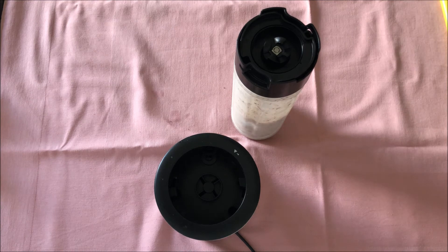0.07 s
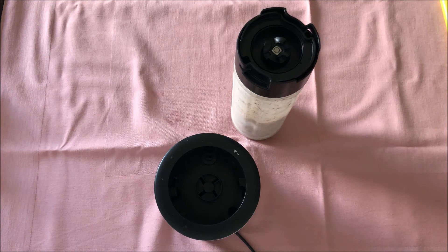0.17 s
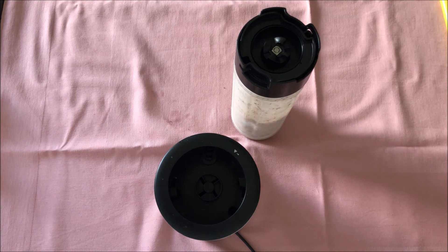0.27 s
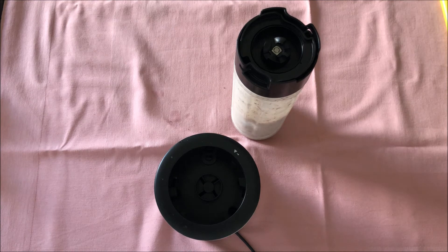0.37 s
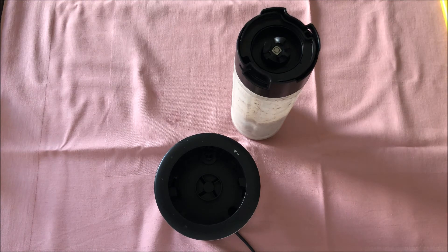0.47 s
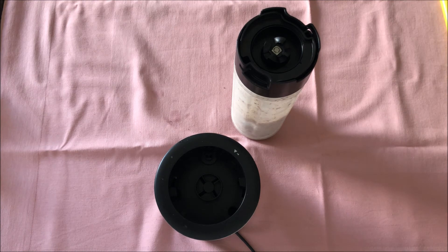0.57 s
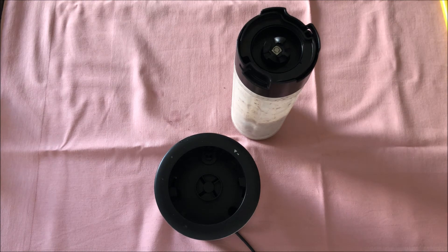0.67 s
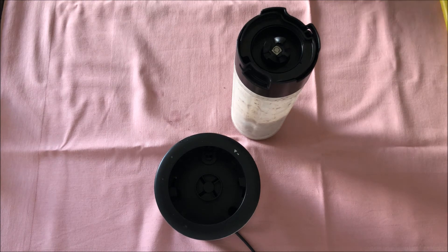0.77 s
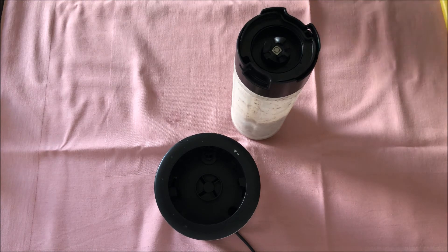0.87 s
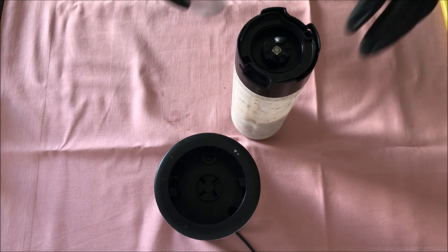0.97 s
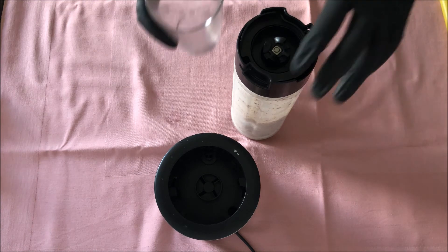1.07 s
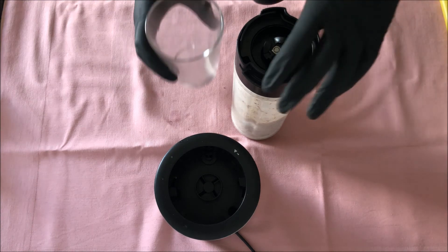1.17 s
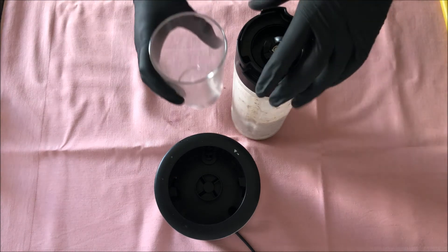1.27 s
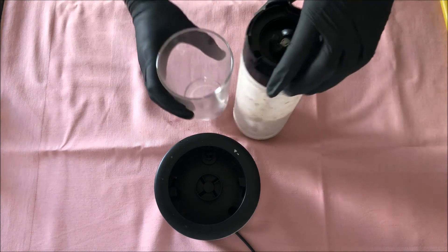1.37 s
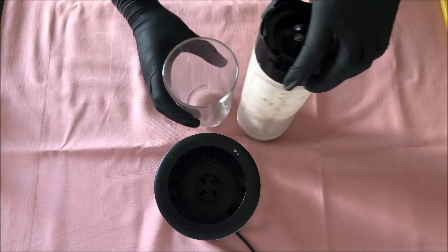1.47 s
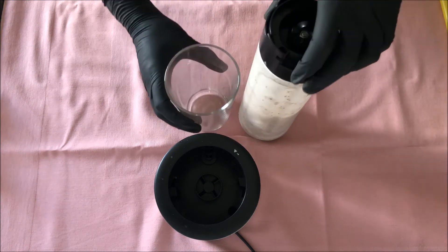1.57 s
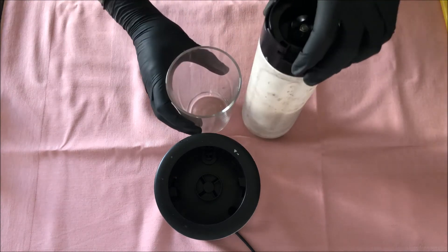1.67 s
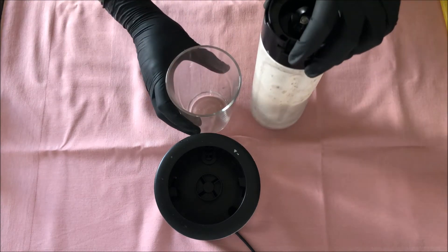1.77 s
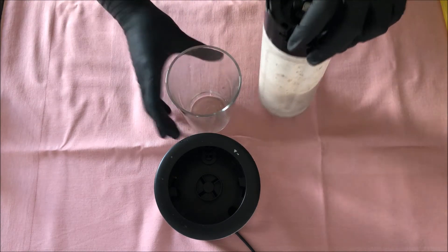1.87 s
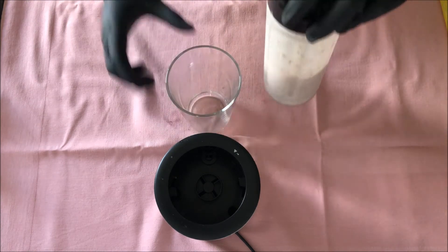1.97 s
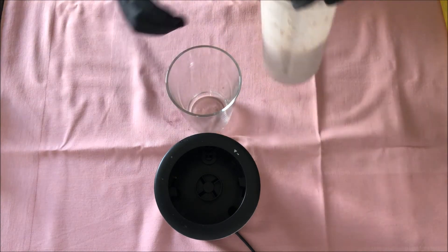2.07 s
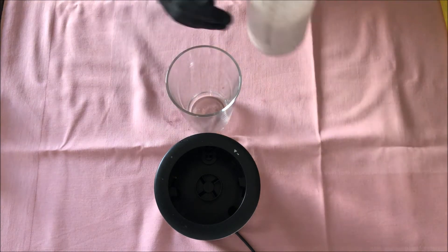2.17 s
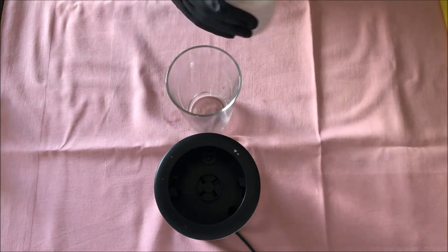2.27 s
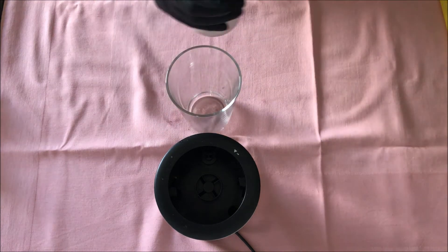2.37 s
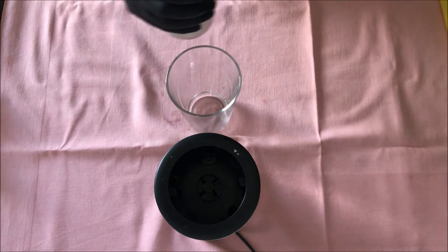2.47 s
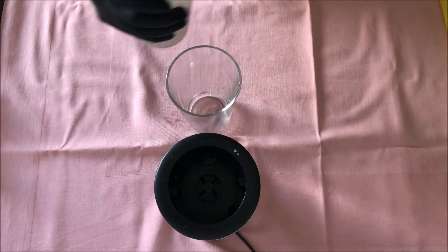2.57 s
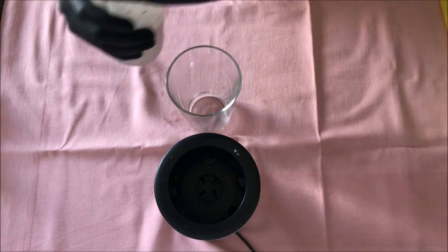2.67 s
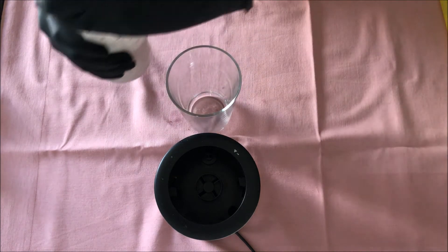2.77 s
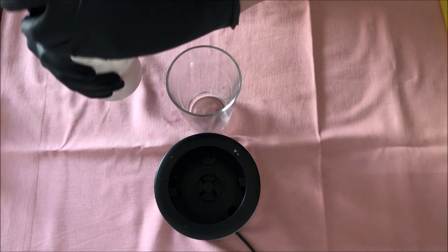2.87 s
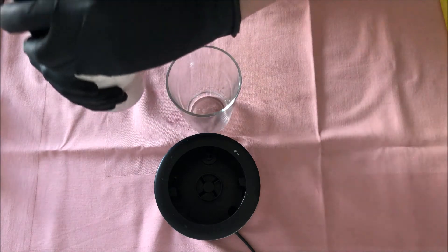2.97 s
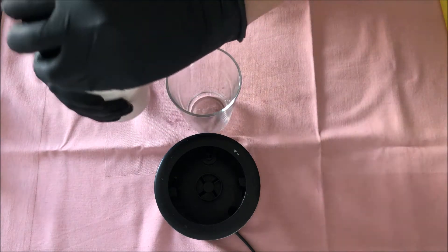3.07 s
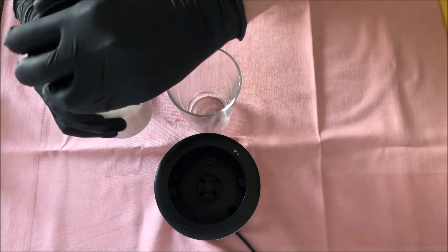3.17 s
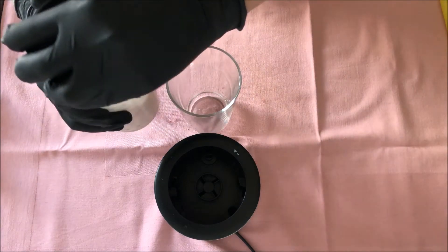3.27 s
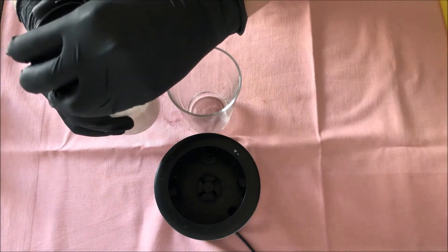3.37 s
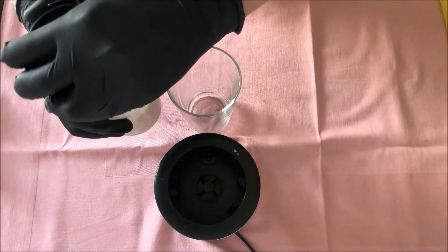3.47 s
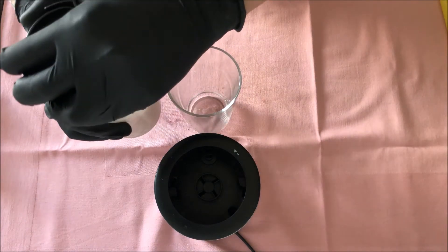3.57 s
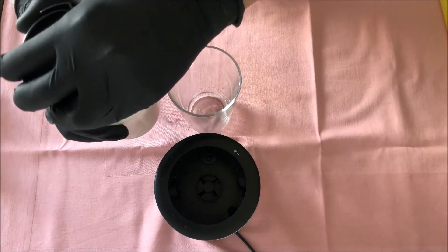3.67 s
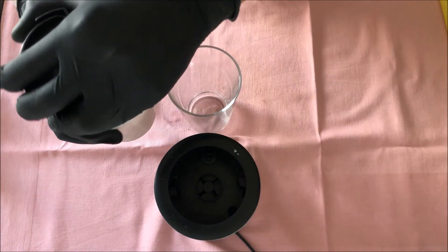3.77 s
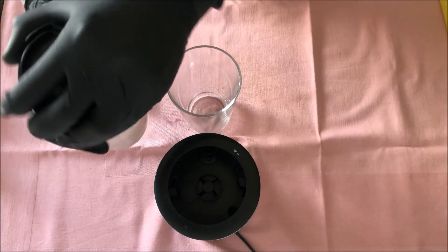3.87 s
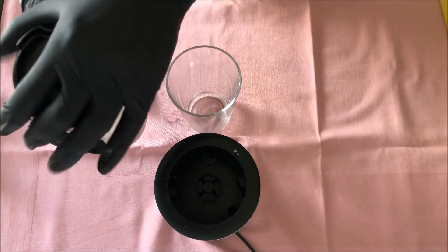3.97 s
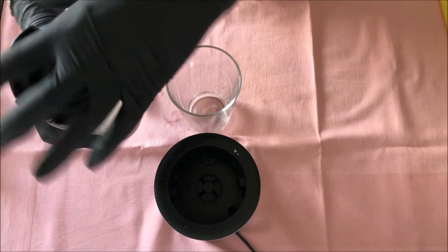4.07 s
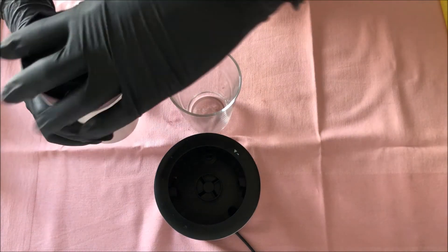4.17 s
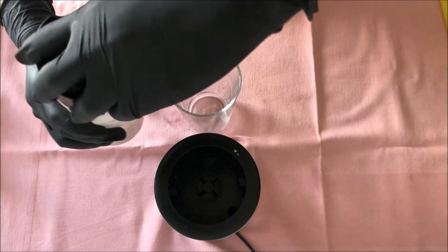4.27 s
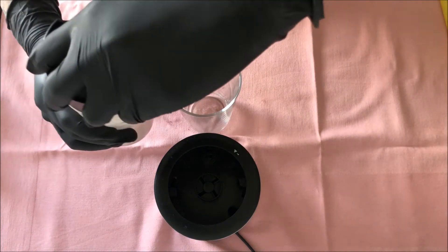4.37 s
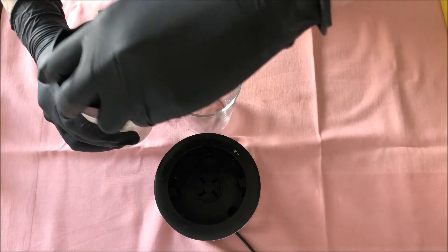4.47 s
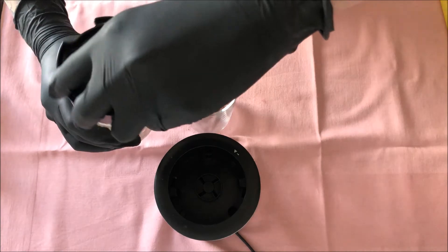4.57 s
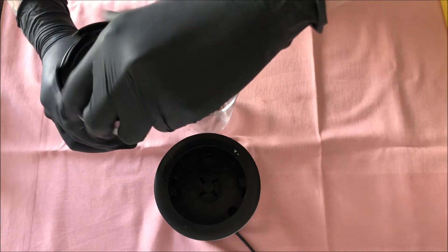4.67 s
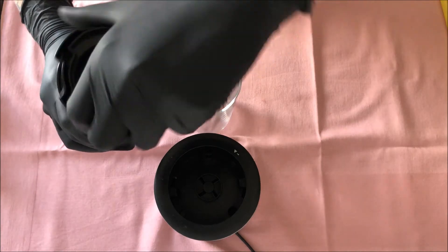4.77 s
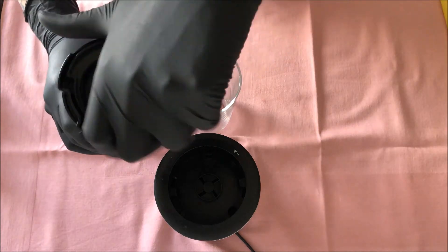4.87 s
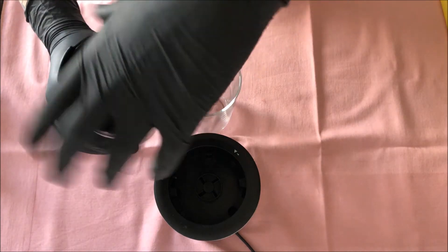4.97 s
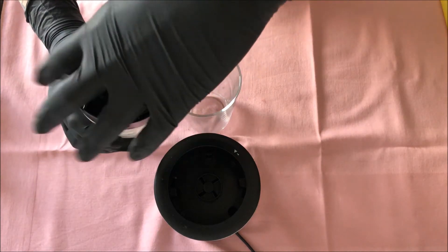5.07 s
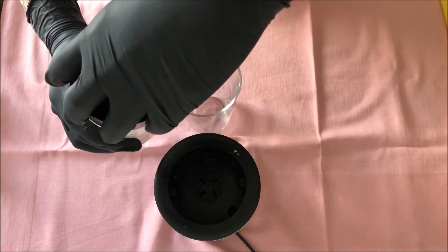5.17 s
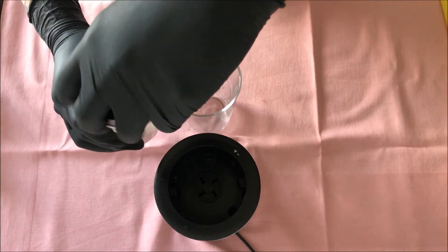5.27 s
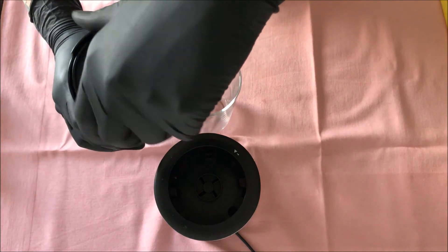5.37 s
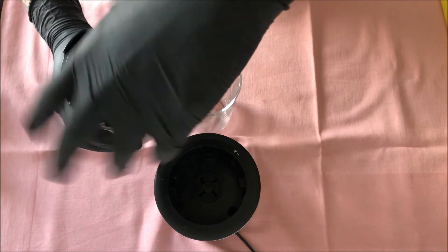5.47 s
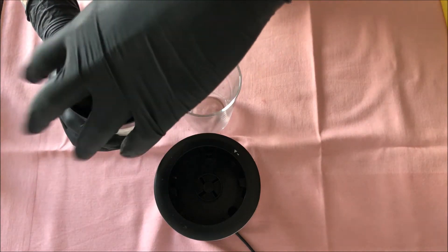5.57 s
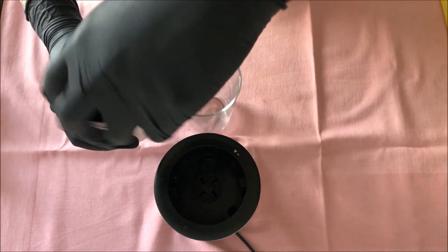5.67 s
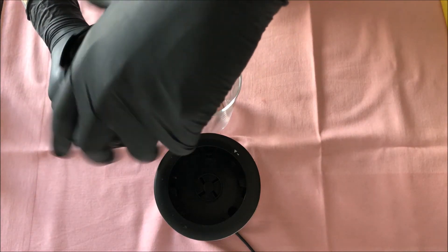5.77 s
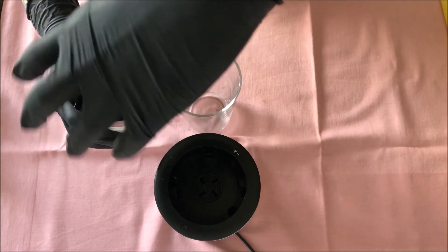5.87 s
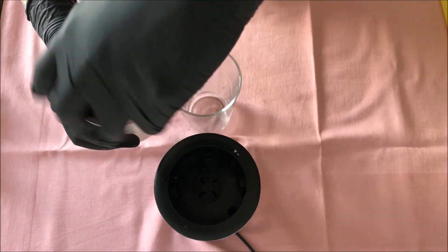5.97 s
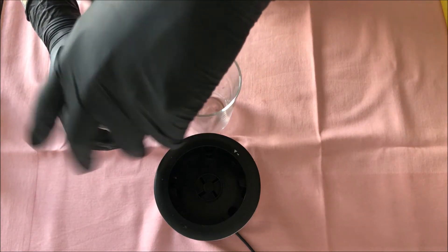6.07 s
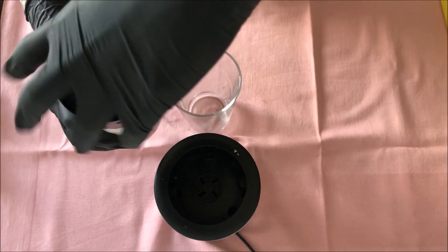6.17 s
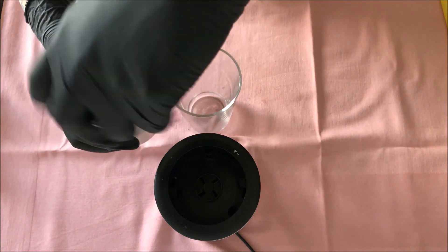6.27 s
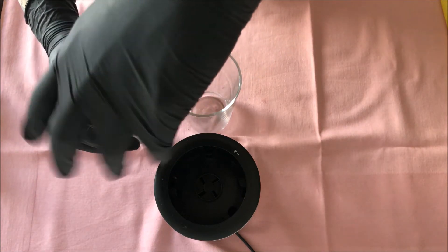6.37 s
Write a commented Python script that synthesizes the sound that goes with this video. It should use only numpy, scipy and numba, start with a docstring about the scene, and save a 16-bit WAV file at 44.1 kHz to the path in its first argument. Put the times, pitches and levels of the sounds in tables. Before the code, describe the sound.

A glass thumps onto a cloth-covered table, then gloved hands unscrew a plastic cup's lid with scrapes and sharp clicks.

```python
"""A small quiet room hums with a low drone and a thin whine while gloved hands rustle and tick.
At about 1.6 s they set a tumbler down on a cloth-covered table, and the table top booms under it.
They lift a plastic cup and, from about 3.2 s to the end, unscrew its lid turn by turn:
the thread sticks and slips, so the lid scrapes and snaps. The room adds a short echo."""
import sys
import numpy as np
from scipy import signal
from scipy.io import wavfile
from scipy.ndimage import uniform_filter1d
from numba import njit

SR = 44100
rng = np.random.default_rng(int(sys.argv[2]) if len(sys.argv) > 2 else 0)


def unload_wav(signal):
    """Save mono or channel-first audio to the path in sys.argv[1] as 16-bit WAV at rate SR, clipped to [-1, 1]."""
    wavfile.write(
        sys.argv[1],
        SR,
        np.round(np.clip(np.atleast_2d(signal).T, -1, 1) * 32767).astype(np.int16),
    )


N = 283563
TIME = np.arange(N) / SR

# low notes at which the lid and cup wall ring: f/Hz, width/Hz, relative level/dB
LID_LOW_MODES = [(484, 206, -0.5), (992, 134, -1), (1113, 110, 1), (1362, 104, 6), (1450, 290, 3.5),
                 (1767, 340, 2), (1930, 35, 7), (2150, 230, -3.5), (2377, 99, 0.5), (2664, 620, -3)]


def undb(db):
    """Turn decibels into a gain."""
    return 10 ** (np.asarray(db) / 20)


def unit(x):
    """Scale to an average (rms) level of 1."""
    return x / np.sqrt(np.mean(x ** 2))


def band(x, hz, width):
    """A resonance: keeps the sound near hz and weakens the rest."""
    return signal.lfilter(*signal.iirpeak(min(hz, .45 * SR), hz / width, fs=SR), x)


@njit
def glide(x, hz, width):
    """A resonance whose pitch moves (a state-variable filter)."""
    out, band_state, low_state = np.empty(len(x)), 0., 0.
    for i in range(len(x)):
        step, damping = np.tan(np.pi * hz[i] / SR), width / hz[i]
        passed = (band_state + step * (x[i] - low_state)) / (1 + step * (step + damping))
        band_state = 2 * passed - band_state
        low_state += 2 * step * passed
        out[i] = damping * passed
    return out


def body(x, modes):
    """An object ringing at several notes; neighbouring notes swing opposite ways."""
    return sum((-1) ** k * undb(db) * band(x, hz, width) for k, (hz, width, db) in enumerate(modes))


def add(track, start, sound):
    """Mix a short sound in at start seconds."""
    i = int(start * SR)
    track[i:i + len(sound)] += sound[:N - i]


def wander(per_s):
    """A smooth random wobble of size 1, with per_s new values a second."""
    hold = int(SR / per_s)
    steps = np.repeat(rng.standard_normal(N // hold + 1), hold)
    return unit(uniform_filter1d(uniform_filter1d(steps, hold), hold)[:N])


def grains(per_s, spread_db):
    """Random clicks, many small and a few large."""
    clicks = (rng.random(N) < per_s / SR) * rng.standard_normal(N)
    return clicks * undb(spread_db * np.minimum(rng.exponential(size=N), 4.5))


def air():
    """The room's background noise: the bass flickers, the hiss stays nearly even."""
    # tone colour of the noise: f/Hz, relative level/dB
    spectrum = [(15, -42), (25, 11), (91, 2.5), (144, 0.5), (246, -0.5), (495, -2), (895, -14), (1240, -15),
                (2490, -21), (2770, -20), (3000, -20), (3720, -13.5), (15500, -79)]
    out, (freqs, db) = 0, np.transpose(spectrum)
    for hz in 30 * 2 ** np.arange(0, 9.1, .5):  # half-octave steps
        noise = band(band(rng.standard_normal(N), hz, hz / 2), hz, hz / 2)
        flicker_db = 2.5 * min(300 / hz, 1) ** .5 * wander(20)
        out += noise * undb(np.interp(np.log(hz), np.log(freqs), db) + flicker_db)
    return unit(out) * undb(-65)


def drone():
    """A narrow band of low noise that swells and sinks."""
    # loudness of the drone: t/s, level/dB
    levels = [(0.0, -67), (0.35, -71.5), (0.73, -62.5), (1.04, -60), (1.6, -63), (2.1, -69), (3.06, -67.5),
              (3.3, -73), (4.5, -70), (5.0, -76), (6.43, -77)]
    hum = unit(band(rng.standard_normal(N), hz=142, width=18))
    return hum * undb(np.interp(TIME, *np.transpose(levels)))


def whine(hz=2748):
    """A thin tone with a steady pitch and a wavering level."""
    # loudness of the whine: t/s, level/dB
    levels = [(0.0, -80.5), (0.4, -72), (1.2, -81.5), (1.7, -74), (2.4, -76), (2.7, -73), (3.1, -79.5),
              (4.1, -71.5), (4.45, -77), (4.9, -70.5), (5.5, -76), (6.43, -71)]
    tone = np.sqrt(2) * np.sin(2 * np.pi * hz * TIME)
    return tone * undb(np.interp(TIME, *np.transpose(levels)) + 1.5 * wander(30))


def rustle():
    """Sleeves and rubber gloves crackle finely, each pitch band flickering on its own."""
    # movement of the hands: t/s, level/dB, treble lift per band/dB
    movement = [(0.0, -59, 2), (0.6, -58, 1), (0.86, -54, -1), (1.18, -62.5, 1), (1.45, -68, 4),
                (1.84, -60.5, 1.5), (2.17, -67.5, 3.5), (2.44, -59.5, -0.5), (2.67, -59, 0.5),
                (3.15, -61.5, 1), (3.5, -84.5, 7.5), (3.76, -66.5, 2), (3.94, -56, 1.5), (4.23, -59.5, 2),
                (4.45, -66.5, 2), (4.75, -58, 2), (5.1, -79.5, 6), (5.7, -60, 0.5), (6.43, -54, -2.5)]
    out, (times, db, lift) = 0, np.transpose(movement)
    for k, (hz, band_db) in enumerate([(1300, -11), (2500, -15), (4500, -15), (8000, -27), (12500, -24.5)]):
        crackle = unit(grains(per_s=2500, spread_db=2.2)) + .9 * rng.standard_normal(N)
        level_db = band_db + np.interp(TIME, times, db + k * lift) + 1.54 * wander(15)
        out += unit(band(crackle, hz, .86 * hz)) * undb(level_db)
    return out


def glove_swishes():
    """A glove slides over the cup: a short hiss swells and fades."""
    # brief slides: t/s, length/s, level/dB, f/Hz
    swishes = [(1.417, 0.063, -65, 6750), (1.632, 0.082, -62.5, 1510), (1.907, 0.078, -61.5, 3506),
               (2.429, 0.044, -61.5, 9100), (2.49, 0.15, -58, 7550), (2.706, 0.055, -63, 9000),
               (2.732, 0.089, -67.5, 10000), (3.03, 0.022, -76, 7000), (4.002, 0.045, -51, 9000),
               (4.416, 0.021, -65.5, 4900)]
    out = np.zeros(N)
    for start, length, db, hz in swishes:
        fade = np.hanning(int(length * SR))
        hiss = unit(band(rng.standard_normal(9000), hz, 1.4 * hz))
        add(out, start, undb(db) * fade * hiss[:len(fade)])
    return out


def glove_squeaks():
    """Rubber squeaks under the fingers: a rough falling tone and its octave."""
    # squeaks: t/s, length/s, first f/Hz, last f/Hz, level/dB, relative octave level/dB
    squeaks = [(4.219, 0.013, 3750, 3500, -50.5, -12), (4.237, 0.022, 3080, 2920, -55.5, 1.5),
               (4.25, 0.017, 2720, 2610, -52, -5)]
    out = np.zeros(N)
    for start, length, first_hz, last_hz, db, octave_db in squeaks:
        fade = np.hanning(int(length * SR))
        phase = 2 * np.pi * np.cumsum(np.linspace(first_hz, last_hz, len(fade))) / SR
        phase += .11 * np.cumsum(rng.standard_normal(2000))[:len(fade)]  # roughens the tone
        add(out, start, undb(db) * fade * (np.sin(phase) + undb(octave_db) * np.sin(2 * phase)))
    return out


def lid_squeal():
    """The lid squeals faintly while it is forced: noise narrowed to a sliding note."""
    # course of the squeal: t/s, f/Hz, level/dB
    course = [(4.24, 1106, -82), (4.254, 1070, -67), (4.28, 1150, -71), (4.408, 1200, -66),
              (4.7, 1120, -74)]
    times, hz, db = np.transpose(course)
    note = unit(glide(rng.standard_normal(N), np.interp(TIME, times, hz), width=60.))
    return note * undb(np.interp(TIME, times, db, left=-200, right=-200))


def table_ring(swell_ms=5.36):
    """The table top after a sharp tap: the bending spreads slowly, so the boom takes a moment to swell."""
    # notes of the table top: f/Hz, relative level/dB, time to fade by 60 dB/s
    modes = [(78.6, -18.5, 0.2), (104.6, -10.5, 0.16), (113.1, -32, 0.82), (170, -24, 0.034),
             (201, -30, 0.18), (202.6, 5.5, 0.04), (200.5, -22, 0.29), (238, -7.5, 0.094), (256, -22, 0.18),
             (334, -9, 0.13), (321.7, -28, 0.16), (370, -20.5, 0.082), (522, -16, 0.049),
             (680, -18.5, 0.045), (920, -18, 0.026)]
    t = TIME[:SR // 2]
    ring = sum(undb(db - 60 * t / t60) * np.sin(2 * np.pi * hz * t) for hz, db, t60 in modes)
    swell = 1 - np.exp(-(t * 1000 / swell_ms) ** 2)
    return -ring * swell  # minus: the top first moves away from the listener


def table_blows():
    """The cloth softens each knock into a rounded push that makes the table top boom."""
    # knocks, the loudest being the tumbler: t/s, peak level/dB, contact time/ms
    knocks = [(0.595, -44.5, 5.5), (1.231, -46, 9.2), (1.635, -8.5, 1.37), (1.652, -27, 0.84),
              (3.195, -41, 4.9), (3.219, -53, 3.8), (3.258, -56, 2.2), (3.295, -46, 2.1), (4.229, -50.5, 1),
              (4.295, -50.5, 5.1), (4.839, -47, 9.5), (4.886, -34.5, 2.9), (5.214, -48.5, 8.9),
              (5.398, -43.5, 1.2), (5.483, -40.5, 1.1), (5.723, -46.5, 5), (5.792, -32.5, 1.5),
              (5.823, -30.5, 3.5), (6.061, -41, 3.3), (6.107, -30.5, 2.9), (6.15, -42, 2.1),
              (6.334, -36.5, 4.5), (6.403, -30, 1.7)]
    out, ring = np.zeros(N), table_ring()
    for start, db, contact_ms in knocks:
        progress = TIME[:SR // 100] * 1000 / (contact_ms / 4)
        boom = signal.fftconvolve(ring, progress * np.exp(-progress))
        add(out, start, undb(db) * boom / np.abs(boom).max())
    return out


def snaps(rise_ms=.54, edge_hz=5100, edge_width_hz=7100):
    """The lid snaps and gloves tick: a dying burst of noise rings the struck spot and the lid."""
    # snaps and ticks: t/s, peak level/dB, f/Hz, relative level of the crisp edge/dB, fade time/ms
    clicks = [(0.605, -51.5, 980, -19, 2.6), (0.614, -41.5, 1160, -2.5, 3.1), (0.62, -42, 495, -16, 3.2),
              (1.451, -48, 4200, -13, 4.9), (2.434, -45, 3600, -23, 4.6), (2.594, -32, 1570, 1.5, 1.75),
              (2.645, -49.5, 2920, 1, 2.5), (2.718, -49, 2900, 2, 2), (2.77, -47, 1530, -5, 1.1),
              (2.808, -45.5, 2760, 17, 1.9), (2.86, -36.5, 3850, -3.5, 4.6), (2.903, -46, 1430, 6, 4.9),
              (2.989, -47.5, 1700, -12, 2.5), (3.02, -51.5, 1660, -20, 3.6), (3.039, -50, 441, 2, 2.2),
              (3.128, -42.5, 1640, 0.5, 1.8), (3.186, -32.5, 2140, -17, 1.7), (3.201, -28, 1130, -18, 1.1),
              (3.207, -24.5, 935, -11, 1.9), (3.241, -32, 1190, -5.5, 3.2), (3.252, -29.5, 930, -20, 1.8),
              (3.292, -34, 1640, -9.5, 3), (3.417, -48, 1460, -6, 3.1), (3.48, -57, 2750, 1, 2.2),
              (3.519, -49.5, 4340, 2, 2.9), (3.716, -46.5, 1440, -11.5, 2.9), (3.916, -48, 1670, -22, 1.6),
              (3.927, -28, 1720, -10.5, 1.55), (3.97, -40.5, 1620, 2, 1.4), (4.058, -46, 4170, -7, 2.3),
              (4.075, -44, 1890, 6, 4.4), (4.09, -39.5, 1730, 1, 2), (4.106, -28.5, 1730, 4.5, 0.94),
              (4.114, -49, 1910, -10, 1.4), (4.125, -48, 2330, -1, 2.1), (4.146, -46.5, 2720, -7, 2.3),
              (4.177, -37.5, 2820, 3, 1.7), (4.438, -47.5, 1160, -3.5, 1), (4.627, -50, 1130, 15, 2),
              (4.766, -41, 1700, -8, 1.5), (4.884, -24, 1840, -6.5, 6), (4.895, -23.5, 3900, -2, 4.2),
              (4.974, -36.5, 3740, 16, 2.1), (5.223, -47.5, 2750, 13, 4.7), (5.387, -35, 2290, -8, 5.3),
              (5.395, -33.5, 2420, 9, 3.4), (5.464, -45, 4130, -2, 2.1), (5.477, -34, 1960, -19, 2.8),
              (5.711, -51, 3700, 3, 2.5), (5.728, -55, 4500, 9, 3.5), (5.748, -49, 2000, -4, 4.9),
              (5.786, -29.5, 2870, -29, 3.5), (5.804, -24, 4770, -14, 6.8), (5.825, -40, 4460, -21, 1.8),
              (6.044, -41.5, 4370, -22, 2.7), (6.092, -32.5, 6740, -1, 6.5), (6.108, -26.5, 4300, -20, 3.2),
              (6.335, -38.5, 1110, -1, 2.1), (6.37, -32.5, 2580, 1, 4.4), (6.399, -30.5, 1460, -13, 4.6),
              (6.416, -29, 1140, -1, 4.3)]
    out, t_ms = np.zeros(N), TIME[:1200] * 1000
    for start, db, hz, edge_db, fade_ms in clicks:
        burst = rng.standard_normal(len(t_ms)) * np.exp(-t_ms / fade_ms) * (1 - np.exp(-t_ms / rise_ms))
        burst[0] = 2.18  # breaking free is one sharp tick
        spot = unit(band(band(burst, hz, .45 * hz), hz, .45 * hz))
        broad = unit(band(burst, hz, .89 * hz))
        lid = unit(body(burst, LID_LOW_MODES))
        edge = unit(band(band(burst, edge_hz, edge_width_hz), edge_hz, edge_width_hz))
        snap = spot + undb(-9) * broad + undb(-7.5) * lid + undb(edge_db) * edge
        add(out, start, undb(db) * snap / np.abs(snap).max())
    return out


def stick_slip():
    """The thread catches and lets go: many tiny uneven slips over a smooth rub."""
    friction = unit(grains(per_s=3000, spread_db=2.5)) + .99 * rng.standard_normal(N)
    return friction * undb(2 * wander(60))


def lid_turns(rasp_split=.051, rise_curve=1.43):
    """The slipping thread makes the lid ring, hiss and rasp, and the cup rumble."""
    # the lid's upper ring: f/Hz, width/Hz, relative level/dB
    upper_modes = [(3333, 200, -2), (3387, 70, 3), (3850, 130, 0.5), (3663, 190, -8.5), (4270, 140, 4.5),
                   (4306, 155, 8), (4700, 33, 3)]
    # the lid's hiss: f/Hz, width/Hz, relative level/dB
    hiss_modes = [(6850, 450, -1.5), (8150, 600, -1), (8950, 470, -2.5), (10600, 1500, -4.5),
                  (11900, 13500, -14)]
    # the full cup and the table under it, shaken by the hands: f/Hz, width/Hz, relative level/dB
    rumble_modes = [(88, 120, -7.5), (131, 18, 4), (163, 37.4, 0.5), (210.5, 51, -7), (321.6, 35, -0.5),
                    (475, 117, -7)]
    # the hand leaves one hollow of the lid free to ring; its pitch follows the grip: t/s, f/Hz
    hollow_pitch = [(3.2, 4200), (3.4, 3650), (3.9, 4050), (4.8, 3740), (5.05, 3500), (5.33, 4090),
                    (5.8, 3560), (6.08, 4120), (6.2, 3600), (6.43, 4060)]
    # jerks and drags of the thread: t/s, rise/s, hold/s, time to fade by 60 dB/s, scrape level/dB,
    # then, relative to the scrape, upper ring/dB, hiss/dB, rumble/dB, rasp/dB; last, rasp f/Hz
    slides = [(3.183, 0.0031, .012, 0.073, -40, -7.5, -12.5, -4, -8, 5030),
              (3.196, .008, 0.0054, 0.04, -36.5, -9.5, -27, -1.5, -19, 4800),
              (3.215, 0.014, 0.027, 0.072, -47.5, -28, -19, 3, -18, 4900),
              (3.25, 0.0024, 0.0032, 0.05, -34, -6, -22, -4.5, -15, 4970),
              (3.287, 0.0047, 0.0026, 0.22, -49.5, -14, -22, 0, -13, 5200),
              (3.27, 0.013, 0.03, 1, -58.5, -11.5, -23, -4.5, -22, 5000),
              (3.87, 0.061, 0.0037, 0.033, -50.5, -4, -11, -20, -12, 5200),
              (3.93, 0.0089, .07, 0.84, -71.5, 4, 4, -17, 4, 5130),
              (4.099, 0.0096, .002, 0.057, -49, -12, -4, -20, -3, 5340),
              (4.11, 0.031, 0.039, 0.05, -68.5, -19, 1, 5, -18, 5640),
              (4.763, 0.0052, 0.0026, 0.065, -52.5, -8, -22, 0, -15, 5200),
              (4.74, 0.017, 0.067, 0.17, -60.5, -2, -2.5, -1, -6, 5000),
              (4.82, 0.046, 0.025, 0.06, -50, 3.5, -4, -17, -3, 5230),
              (4.88, 0.013, 0.0059, 0.06, -36, 1, -6, -30, -17, 5670),
              (4.91, 0.023, .03, 0.62, -55.5, -0.5, -10, -4, -7, 5330),
              (5.305, 0.027, 0.13, 0.085, -55, 0.5, -8.5, -8, -2.5, 5470),
              (5.395, 0.011, 0.013, 0.15, -64, 2, 7, 6, 19, 5670),
              (5.476, 0.0033, 0.0049, 0.043, -38.5, -4, -2, -3, -5, 5130),
              (5.49, 0.0054, .005, 0.38, -60, -2, 0, 6.5, 3, 5130),
              (5.785, 0.0017, 0.029, 0.06, -44.5, -7, -7, 3.5, -14, 4800),
              (5.815, 0.0045, .002, 0.13, -34.5, -3.5, -5, -5, -4, 5030),
              (5.83, 0.0083, 0.028, 0.26, -51.5, -2, -9, 3.5, 3.5, 5000),
              (5.9, 0.014, 0.035, 0.33, -67.5, -1, -24, -6, -6, 5300),
              (6.039, 0.0024, 0.041, 0.15, -51.5, -4, -10.5, -3, -3, 5500),
              (6.105, 0.0059, 0.0064, 0.04, -37, -7, -2.5, 0, -11, 5130),
              (6.115, 0.023, 0.027, 0.21, -47.5, -4.5, -11.5, -1.5, 0.5, 5580),
              (6.325, 0.037, .02, 0.35, -49, -2.5, -9, -0.5, -5.5, 5500),
              (6.397, 0.0091, .03, .2, -41, -4, -3.5, 2, -11, 5500)]
    slips, slides = stick_slip(), np.array(sorted(slides))
    rasp_hz = np.interp(TIME, slides[:, 0] + slides[:, 1], slides[:, -1])
    # the rasp is two resonances, just below and above its pitch
    rasp = sum(glide(stick_slip(), rasp_hz * (1 + side * rasp_split), width=280.) for side in (-1, 1))
    hollow = glide(slips, np.interp(TIME, *np.transpose(hollow_pitch)), width=280.)
    upper = unit(body(slips, upper_modes)) + undb(-2) * unit(hollow)
    scrape, hiss, rumble = (body(slips, modes) for modes in (LID_LOW_MODES, hiss_modes, rumble_modes))
    layers = np.array([unit(layer) for layer in (scrape, upper, hiss, rumble, rasp)])
    out = np.zeros(N)
    for start, rise, hold, t60, db, *relative_db, _ in slides:
        i = int(start * SR)
        t = TIME[:min(N - i, SR // 2)]
        swell = np.minimum(t / rise, 1) ** rise_curve
        fade = undb(-60 * np.maximum(t - rise - hold, 0) / t60)
        mix = undb([0, *relative_db]) @ layers[:, i:i + len(t)]
        add(out, start, undb(db) * swell * fade * mix)
    return out


def room(direct, echo_db=-11.5):
    """The walls add a short, smooth echo that dies fastest in the treble."""
    # length of the echo: f/Hz, time to fade by 60 dB/s
    decays = [(150, 0.52), (600, 0.32), (2000, 0.37), (6000, 0.26), (12000, 0.11)]
    t = TIME[:SR // 2]
    tail = sum(band(rng.standard_normal(len(t)), hz, 1.63 * hz) * undb(-60 * t / t60) for hz, t60 in decays)
    tail *= np.clip(t / .0034, 0, 1)  # builds up as the nearest walls answer
    tail /= np.sqrt(np.sum(tail ** 2))
    return direct + undb(echo_db) * signal.fftconvolve(direct, tail)[:N]


def scene():
    """The handling sounds echo in the room; the faint sounds are added without echo. One channel."""
    handling = table_blows() + snaps() + glove_swishes() + glove_squeaks() + lid_turns()
    return (room(handling) + rustle() + drone() + whine() + lid_squeal() + air())[None]


def record(dry, bass_cut_hz=74.5, treble_cut_hz=15800):
    """The microphone loses the deep bass and the highest treble."""
    thin = signal.sosfilt(signal.butter(2, bass_cut_hz, btype="high", fs=SR, output="sos"), dry)
    return signal.sosfilt(signal.ellip(10, .2, 70, treble_cut_hz, fs=SR, output="sos"), thin)


dry = scene()
out = record(dry)
unload_wav(out)
```